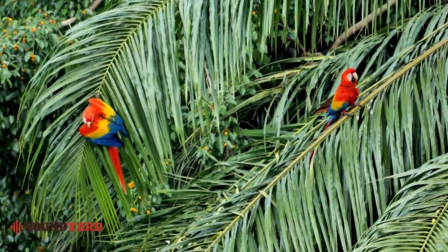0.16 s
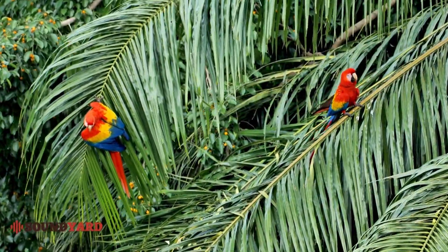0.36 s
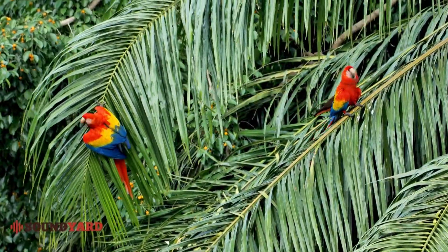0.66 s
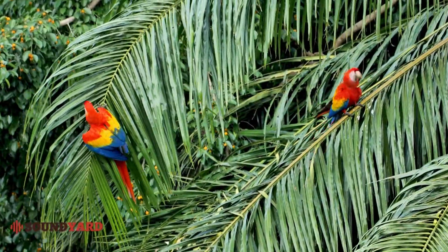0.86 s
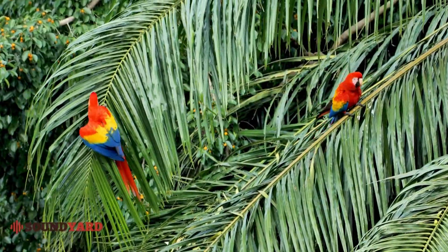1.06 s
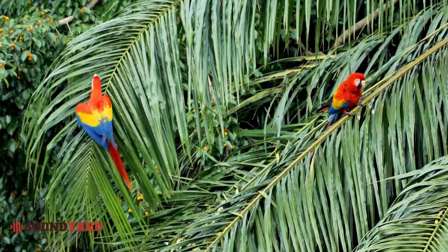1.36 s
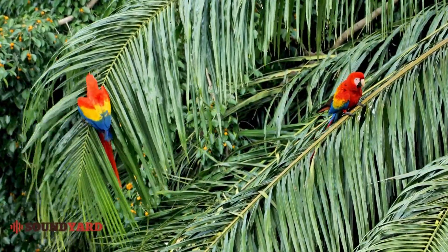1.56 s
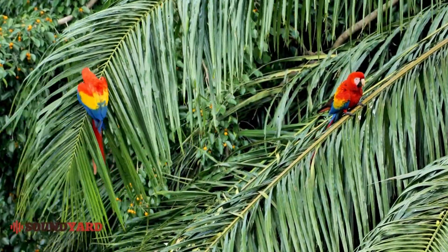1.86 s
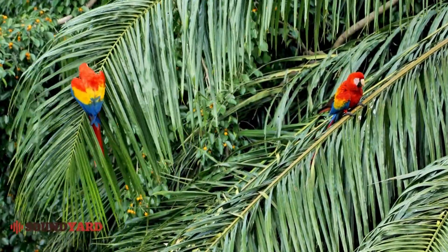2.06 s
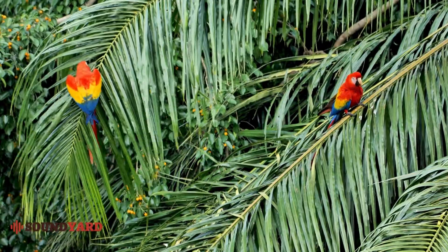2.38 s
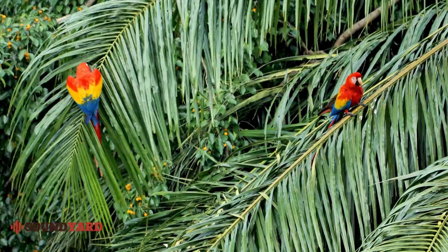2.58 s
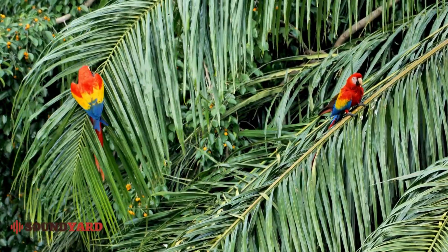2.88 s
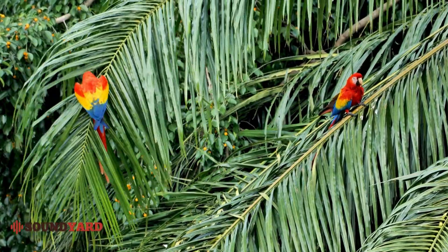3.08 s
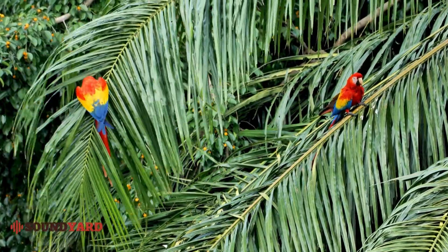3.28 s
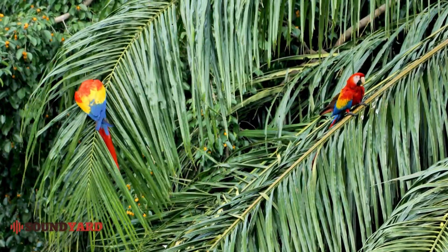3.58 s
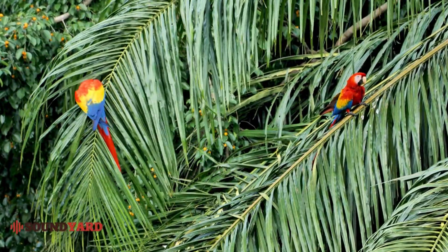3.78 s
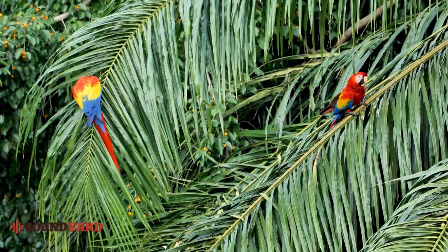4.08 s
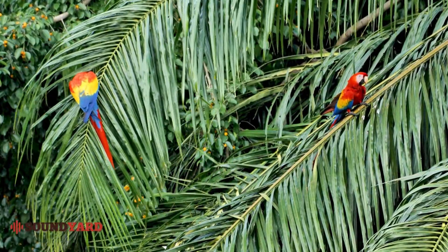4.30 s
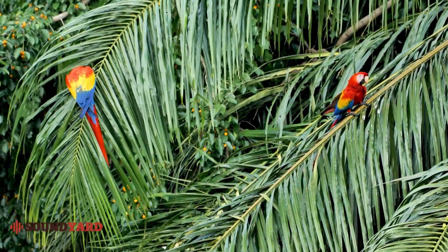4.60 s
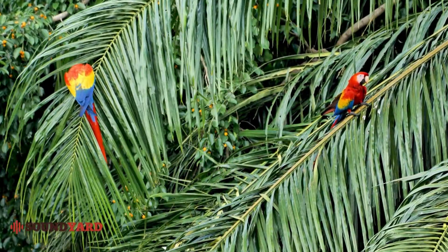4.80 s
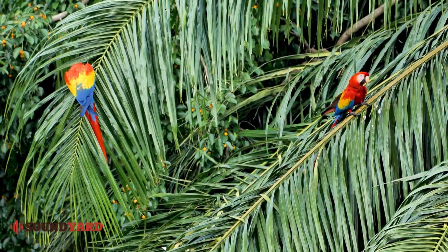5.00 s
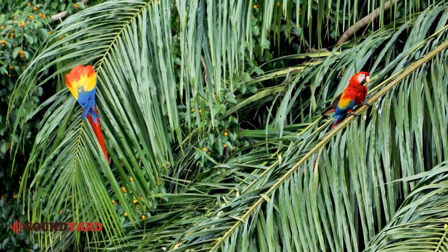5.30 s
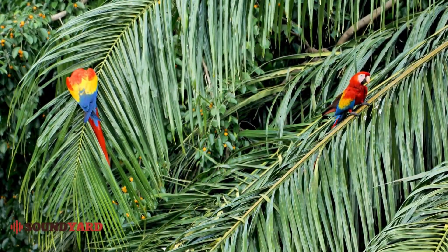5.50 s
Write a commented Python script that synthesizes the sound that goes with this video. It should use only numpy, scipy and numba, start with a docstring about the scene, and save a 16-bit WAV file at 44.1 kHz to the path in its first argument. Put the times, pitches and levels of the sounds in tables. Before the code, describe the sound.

In a palm forest, a distant bird yelps and fronds snap over soft leaf hiss and wind rumble. A nearby macaw gives two harsh, raspy screams joined by a creaking growl. The far bird whines, yelps and whistles faintly, then the macaw growls and screams twice more, the loudest scream slightly overloading the microphone. The calls echo in the trees, all on the left.

```python
"""Scarlet macaws in palm forest. Over leaf hiss and wind rumble a far bird yelps and whistles; fronds snap.
From 0.75 s a near bird gives two harsh screams joined by a creaking growl: uneven syrinx pulses ring its
throat, and each scream surges, brightens as the beak opens and dulls as it shuts. The far bird whines at
2.2 s, then yelps and whistles. From 4.2 s come more growls and a second pair of screams, the loudest
overloading the microphone. The trees echo throughout. All is on the left; the right has only faint hiss."""
import sys
import numpy as np
from scipy import signal
from scipy.fft import rfft, irfft
from scipy.io import wavfile
from scipy.ndimage import uniform_filter1d
from numba import njit

SR = 44100
rng = np.random.default_rng(int(sys.argv[2]) if len(sys.argv) > 2 else 0)


def generate_wav(sig):
    """Save sig (samples, or channels by samples) to the path in sys.argv[1] as 16-bit PCM at SR."""
    pcm = np.round(np.clip(np.atleast_2d(sig).T, -1, 1) * 32767).astype(np.int16)
    wavfile.write(sys.argv[1], SR, pcm)


N = 249165
T = np.arange(N) / SR


def undb(db):
    """Decibels to gain."""
    return 10 ** (np.asarray(db) / 20)


def unit(x):
    """Scale to rms 1."""
    return x / np.sqrt(np.mean(x ** 2) + 1e-18)


def steady(x):
    """Hold the 40 ms rms at 1, keeping the fast rasp."""
    return x / np.sqrt(uniform_filter1d(x ** 2, SR // 25) + 1e-12)


def curves(rows):
    """Linear interpolation over T, one curve a column."""
    times, *columns = np.transpose(rows)
    return [np.interp(T, times, column) for column in columns]


def butter(x, hz, kind, order=2):
    """Butterworth low-, high- or band-pass."""
    return signal.sosfilt(signal.butter(order, np.minimum(hz, .45 * SR), kind, fs=SR, output="sos"), x)


def walk(n, hz):
    """Random drift, rms 1, low-passed at hz."""
    return unit(butter(rng.standard_normal(n + SR), hz, "low")[SR:])


def colour(x, points, size=2048):
    """Minimum-phase filter through (f/Hz, gain/dB) points."""
    hz, db = np.transpose(points)
    bin_hz = np.arange(size // 2 + 1) * SR / size
    gain = undb(np.interp(np.log(bin_hz + 1), np.log(hz), db))
    cepstrum = irfft(np.log(gain))
    cepstrum[1:size // 2] *= 2
    cepstrum[size // 2 + 1:] = 0
    return signal.oaconvolve(x, irfft(np.exp(rfft(cepstrum))))[:len(x)]


@njit
def resonate(x, hz, width_hz):
    """State-variable band-pass, unity gain at its moving centre."""
    y, band_state, low_state = np.empty(len(x)), 0., 0.
    for i in range(len(x)):
        g, damping = np.tan(np.pi * hz[i] / SR), width_hz / hz[i]
        band = (band_state + g * (x[i] - low_state)) / (1 + g * (g + damping))
        band_state = 2 * band - band_state
        low_state += 2 * g * band
        y[i] = damping * band
    return y


def throat(x, resonances, stretch, waver=.023, waver_db=2.5, waver_hz=22):
    """Add wavering resonances, their centres scaled together by stretch."""
    out = x
    for hz, width_hz, db in resonances:
        centre_hz = hz * stretch * (1 + waver * walk(len(x), waver_hz))
        gain = undb(db + waver_db * walk(len(x), waver_hz))
        out = out + gain * resonate(x, centre_hz, float(width_hz))
    return out


def span(start_s, length_s):
    """Sample mask of an event and its age in s."""
    on = (T >= start_s) & (T < start_s + length_s)
    return on, T[on] - start_s


def note(start_s, length_s, first_hz, last_hz):
    """Sample mask, rounded envelope and linear glide of a short event."""
    on, age = span(start_s, length_s)
    progress = age / length_s
    swell = np.sqrt(np.abs(np.sin(np.pi * progress)))
    return on, swell, first_hz + (last_hz - first_hz) * progress


def fade(x, edge_s=.0023):
    """Taper both ends: the air flow starts and stops."""
    return x * signal.windows.tukey(len(x), min(1, 2 * edge_s * SR / len(x)))


# Leaf hiss spectrum: f/Hz, gain/dB
LEAF_SPECTRUM = [(60, -9), (120, 0.5), (300, -1), (480, 0), (700, -3), (1500, -4), (3400, -6.5),
                 (8800, -13), (15500, -18)]
# Breeze: t/s, level/dB
BREEZE_LEVEL = [(0, -56.5), (1, -52), (2, -58), (2.9, -55.5), (3.45, -51.5), (4.2, -51.5), (5.65, -56.5)]


def forest():
    """Leaf hiss swells with the breeze and flickers slightly."""
    db, = curves(BREEZE_LEVEL)
    hiss = unit(colour(rng.standard_normal(N), LEAF_SPECTRUM))
    return hiss * undb(db + .5 * walk(N, hz=2.1))


# Air rumble: t/s, level/dB
RUMBLE_LEVEL = [(0, -49.5), (1.2, -56), (1.7, -64.5), (3.6, -52.5), (5.65, -57)]
# Air puffs: t/s, length/s, level/dB, cutoff/Hz
AIR_PUFFS = [(-.02, 0.065, -38, 44.7), (4.153, 0.037, -43.5, 130), (4.897, 0.035, -38, 119.9),
             (5.359, 0.041, -35, 80)]


def wind():
    """Air rumbles on the microphone, with a few stronger puffs."""
    db, = curves(RUMBLE_LEVEL)
    rumble = butter(rng.standard_normal(N), 58, "low")
    out = undb(db) * unit(butter(rumble, 4.4, "high"))
    for start_s, length_s, db, hz in AIR_PUFFS:
        on, swell, _ = note(start_s, length_s, hz, hz)
        puff = unit(butter(rng.standard_normal(N), hz, "low"))
        out[on] += undb(db) * swell * puff[on]
    return out


# Far voice spectrum: f/Hz, gain/dB
FAR_SPECTRUM = [(600, -33), (1400, -2), (2600, -4), (3400, 4.5), (4400, 4.5), (5300, 5), (6500, -4),
                (9000, -14), (15000, -38)]


def hoarse(hz, rough, throat_hz, wobble, wobble_hz=300, width_hz=800, boost_db=3):
    """Far voice: unsteady harmonics and pulsing air, with one resonance near 0.97 * throat_hz."""
    pitch_hz = hz * (1 + wobble * rough * walk(len(hz), wobble_hz))
    phase = 2 * np.pi * np.cumsum(pitch_hz) / SR
    harmonics = unit(sum(np.cos(k * phase) for k in range(1, 7)))
    air = rng.standard_normal(len(hz)) * (1 + np.cos(phase))
    voice = colour((1 - rough) * harmonics + rough * air, FAR_SPECTRUM)
    return unit(throat(voice, [(throat_hz, width_hz, boost_db)], stretch=.97))


# Yelps: t/s, length/s, level/dB, roughness/0-1, nominal throat f/Hz
FAR_YELPS = [(-.04, 0.078, -34, 0.69, 5400), (0.147, 0.067, -39, 0.6, 4260), (0.296, 0.097, -39, .85, 4440),
             (.489, .098, -43.5, 0.83, 4480), (0.666, .094, -40.5, 0.86, 4400),
             (2.587, 0.088, -41, 0.9, 4800)]


def yelps(first_hz=1726, last_hz=1214):
    """The far bird's short, hoarse, falling calls."""
    out = np.zeros(N)
    for start_s, length_s, db, rough, throat_hz in FAR_YELPS:
        on, swell, hz = note(start_s, length_s, first_hz, last_hz)
        out[on] += undb(db) * swell * hoarse(hz, rough, throat_hz, wobble=.057)
    return out


# Tree echo bands: f/Hz, t60/s
ECHO_BANDS = [(700, 1), (1800, 0.89), (4000, 0.95), (9000, 0.35)]


def trees(x, build_s=.004, grain_db=5.3):
    """Trunks and leaves scatter a grainy echo that dies band by band."""
    t = T[:SR]
    scatter = rng.standard_normal(SR) * undb(grain_db * rng.standard_normal(SR))
    tail = sum(butter(scatter, [hz * .49, hz * 1.474], "band") * undb(-60 * t / t60_s)
               for hz, t60_s in ECHO_BANDS)
    tail *= 1 - np.exp(-t / build_s)
    return signal.fftconvolve(x, unit(tail) / np.sqrt(SR))[:N]


# Frond snaps: t/s, level/dB, centre f/Hz, decay/s
FROND_SNAPS = [(.29, -28.5, 1500, 0.0052), (0.308, -36.5, 1520, 0.014), (.326, -40, 1800, 0.053),
               (0.755, -32.5, 1390, 0.0039), (3.552, -45.5, 3500, 0.0049), (3.75, -52, 8000, .008),
               (3.875, -50, 4800, .01), (5.364, -30.5, 10300, 0.039)]


def fronds(rise_s=.00028):
    """Stiff leaves snap in short, dry bursts."""
    out = np.zeros(N)
    for start_s, db, hz, decay_s in FROND_SNAPS:
        on, age = span(start_s, 10 * decay_s)
        burst = unit(butter(rng.standard_normal(len(age)), [hz * .5, hz * 1.5], "band", order=3))
        envelope = np.exp(-age / decay_s) * (1 - np.exp(-age / rise_s))
        out[on] += undb(db) * envelope * burst
    return out


# Whistles: t/s, length/s, first f/Hz, last f/Hz, level/dB
FAR_WHISTLES = [(0.425, 0.024, 2690, 2590, -45), (0.487, 0.026, 2370, 2430, -52),
                (2.74, 0.035, 1640, 1810, -49)]


def whistles(wobble=.05, wobble_hz=300):
    """The far bird's soft, unsteady gliding tones."""
    out = np.zeros(N)
    for start_s, length_s, first_hz, last_hz, db in FAR_WHISTLES:
        on, swell, hz = note(start_s, length_s, first_hz, last_hz)
        hz *= 1 + wobble * walk(len(hz), wobble_hz)
        out[on] += undb(db) * swell * unit(np.sin(2 * np.pi * np.cumsum(hz) / SR))
    return out


def syrinx(hz, jitter, scatter_db, rasp, puff_s):
    """Membranes slap shut at uneven intervals; a puff of turbulence follows each slap."""
    n = len(hz)
    timing, strength = rng.standard_normal((n // 10, 2)).T
    cycles = np.cumsum(hz) / SR
    spread = np.interp(np.arange(len(timing)), cycles, jitter)
    slap_cycles = np.cumsum(np.exp(spread * timing - spread ** 2 / 2))
    heard = slap_cycles < cycles[-1]
    slap_samples = np.searchsorted(cycles, slap_cycles[heard])
    pulses = np.bincount(slap_samples, undb(scatter_db * strength[heard]), n)
    puffs = signal.lfilter([1], [1, -np.exp(-1 / (puff_s * SR))], pulses) * rng.standard_normal(n)
    slaps = butter(unit(pulses), 9200, "low", order=3)  # finite closing time
    return slaps + rasp * unit(puffs)


def perch_echo(x, db, decay_s=.023):
    """Early echoes off nearby fronds smear the slaps and comb the spectrum."""
    t = T[:SR // 25]
    spray = rng.standard_normal(len(t)) * np.exp(-t / decay_s) * (t > .001)
    return x + undb(db) * signal.fftconvolve(x, spray / np.linalg.norm(spray))[:len(x)]


def breath_db(age, length_s, attack_s, release_s, edge_db):
    """One push of air: rise from edge_db, hold at 0, fall back."""
    rising = np.maximum(1 - age / attack_s, 0) ** 1.5
    falling = np.maximum(1 - (length_s - age) / release_s, 0)
    return edge_db * (rising + falling)


def effort(x, db, bright_db, split_hz=2500):
    """Air pressure sets the level; bright_db sets the upper band against the lower."""
    low = signal.sosfiltfilt(signal.butter(4, split_hz, fs=SR, output="sos"), x)
    return undb(db) * (steady(low) + undb(bright_db) * steady(x - low))


# Screams: t/s, length/s, attack/s, beak opening/s, held low-band level/dB, surge/dB,
# mouth ring/dB, upper band/dB, high hiss/dB (these three at full, re low band), first mouth f/Hz
NEAR_SCREAMS = [(.755, .578, 0.098, .15, -25, 1.5, 3.3, 2.56, -28, 2054),
                (1.513, .595, .035, .04, -30, 8.05, 5.56, 4.3, -27.5, 2120),
                (4.338, .631, .045, .18, -21.5, 4.47, 3.1, 6.1, -7.5, 2210),
                (5.235, .58, 0.033, 0.059, -24.5, 2.5, 2.4, 4.14, -19.5, 2260)]
# Scream spectrum: f/Hz, gain/dB
SCREAM_SPECTRUM = [(88, -110), (150, -52), (352, -59.5), (530, -15.5), (668, -23.5), (1090, -2.5),
                   (1730, 0), (2100, -3.5), (2550, -2), (2810, -3), (3280, -4), (4060, -5), (6470, -24),
                   (7270, -21), (15500, -44.5)]
# Throat resonances, beak open, mouth at mouth_ref_hz: f/Hz, width/Hz, gain/dB
OPEN_FORMANTS = [(950, 170, 1), (1450, 290, -0.5), (2107, 225, 3), (2856, 246, 3.5), (3916, 320, 0),
                 (5400, 1240, 2.5)]
# Peaks in the high hiss: f/Hz (before stretch), width/Hz, gain/dB
HISS_PEAKS = [(7400, 550, 5), (9850, 470, -5), (12800, 410, -13)]


def screams(slap_hz=680, loud_db=-24, db_per_octave=20, jitter=.3, surge_s=.11, shut_s=.08,
            mouth_ref_hz=2023, sag_hz_per_s=240, quiver_db=1.42, quiver_hz=14):
    """Chaotic slaps crowd together as the bird pushes harder; throat and mouth ring."""
    out = np.zeros(N)
    for (start_s, length_s, attack_s, open_s, held_db, surge_db,
         ring_db, bright_db, hiss_db, first_hz) in NEAR_SCREAMS:
        on, age = span(start_s, length_s)
        n = len(age)
        # A shut beak favours the low band.
        shut = 1 - (1 - np.exp(-age / open_s)) * np.minimum((length_s - age) / shut_s, 1)
        db = held_db + surge_db * np.exp(-age / surge_s) + 1.16 * shut
        db += breath_db(age, length_s, attack_s, release_s=.052, edge_db=-17)
        mouth_hz = (first_hz - sag_hz_per_s * age) * (1 + .019 * walk(n, quiver_hz))
        octaves = np.minimum(db - loud_db, 0) / db_per_octave + .15 * walk(n, hz=30)
        chaos = np.minimum(jitter * np.exp(.5 * walk(n, hz=20)), .7)
        slaps = syrinx(slap_hz * 2 ** octaves, chaos, scatter_db=-.5, rasp=.53, puff_s=.0025)
        source = perch_echo(slaps, db=-3.5)
        voice = throat(colour(source, SCREAM_SPECTRUM), OPEN_FORMANTS, (mouth_hz / mouth_ref_hz) ** .5)
        ring = resonate(voice, mouth_hz, width_hz=420.)
        # A high hiss rides on each scream, strongest as overload fizz in the loudest.
        treble = butter(source, [7200, 11500], "band")
        hiss = unit(throat(treble, HISS_PEAKS, stretch=.9, waver=.018))
        ring_gain = undb(db + ring_db - 7 * shut + quiver_db * walk(n, quiver_hz))
        hiss_gain = undb(db + hiss_db - 12 * shut)
        body = effort(voice - ring, db, bright_db - 7 * shut)
        out[on] += fade(body + ring_gain * steady(ring) + hiss_gain * hiss)
    return out


# Growls: t/s, length/s, level/dB, swell/dB, upper band/dB re low band,
# first throat f/Hz, last throat f/Hz, slap rate/Hz, jitter/fraction
NEAR_GROWLS = [(1.323, .19, -29.5, -3.5, -7, 1470, 1590, 186.8, .13),
               (4.227, 0.13, -36, 13.5, -8, 1430, 1580, 160, 0.27),
               (4.931, 0.13, -29.5, -4, -8, 1500, 1540, 195.6, .29),
               (5.072, 0.17, -29, 0, -6, 1620, 1632, 157.2, .08)]
# Growl spectrum: f/Hz, gain/dB
GROWL_SPECTRUM = [(200, -29.5), (420, -23.5), (800, -18.5), (1050, -13.5), (1500, -7), (2000, -8),
                  (2900, -9), (4200, -7), (5600, -15.5), (7200, -28), (15500, -41)]
# Throat resonances, beak nearly shut, tuning at throat_ref_hz: f/Hz, width/Hz, gain/dB
SHUT_FORMANTS = [(1606, 113, 13.7), (2520, 120, 7), (3450, 67, 1.5)]


def growls(throat_ref_hz=1651):
    """The syrinx slows to a creak of separate slaps behind a nearly shut beak."""
    out = np.zeros(N)
    for start_s, length_s, level_db, swell_db, bright_db, first_hz, last_hz, hz, jitter in NEAR_GROWLS:
        on, age = span(start_s, length_s)
        n, progress = len(age), age / length_s
        db = level_db + swell_db * (progress - .5)
        db += breath_db(age, length_s, attack_s=.016, release_s=.034, edge_db=-7)
        throat_hz = first_hz + (last_hz - first_hz) * progress  # climbs as the beak starts to open
        slaps = syrinx(np.full(n, hz), np.full(n, jitter), scatter_db=1.8, rasp=.45, puff_s=.002)
        source = colour(perch_echo(slaps, db=-5.5), GROWL_SPECTRUM)
        voice = throat(source, SHUT_FORMANTS, throat_hz / throat_ref_hz, waver_db=-1)
        out[on] += fade(effort(voice, db, bright_db))
    return out


# Whine contour: t/s, f/Hz, level/dB
FAR_WHINE = [(2.245, 1269, -49), (2.295, 1083, -44), (2.33, 938, -42), (2.365, 976, -44.5),
             (2.43, 1020, -42.5), (2.48, 1060, -45.5)]


def whine(crack_db=1.5, crack_hz=35):
    """The far bird's longer, cracking call dips in pitch and climbs again."""
    out = np.zeros(N)
    on = (T >= FAR_WHINE[0][0]) & (T <= FAR_WHINE[-1][0])
    hz, db = (curve[on] for curve in curves(FAR_WHINE))
    gain = undb(db + crack_db * walk(len(hz), crack_hz))
    out[on] = gain * fade(hoarse(hz, rough=.55, throat_hz=4200, wobble=.025))
    return out


def scene():
    """Left: all sources and their echoes. Right: faint leaf hiss."""
    near = screams() + growls() + fronds()
    far = yelps() + whine() + whistles()
    echoed = near + undb(-15) * trees(near) + undb(-1) * far + undb(-6.5) * trees(far)
    left = undb(5) * (echoed + forest() + wind())
    right = undb(-8) * forest()
    return np.array([left, right])


# Recorder bass roll-off: f/Hz, gain/dB
BASS_ROLLOFF = [(80, -12.5), (170, -6.5), (330, 0.5)]


def record(dry, ceiling=.74, top_hz=15830):
    """The input rounds off the tallest peaks; the bass is thinned and the top cut."""
    clipped = dry / (1 + (dry / ceiling) ** 6) ** (1 / 6)
    thinned = np.array([colour(channel, BASS_ROLLOFF) for channel in clipped])
    return signal.sosfilt(signal.ellip(12, .1, 90, top_hz, fs=SR, output="sos"), thinned)


dry = scene()
out = record(dry)
generate_wav(out)
```